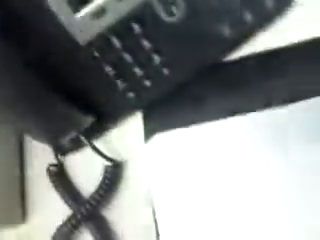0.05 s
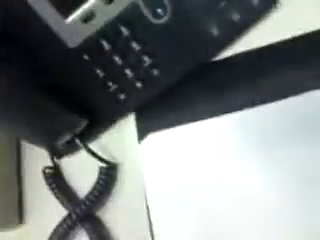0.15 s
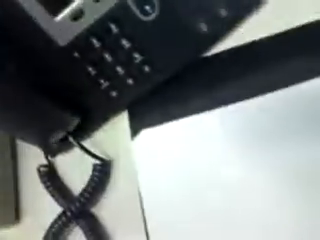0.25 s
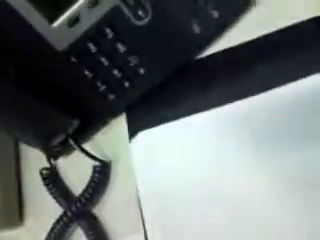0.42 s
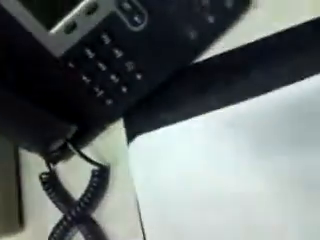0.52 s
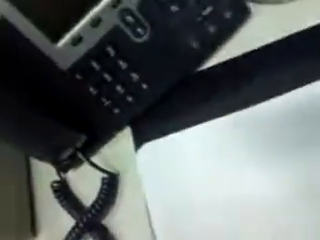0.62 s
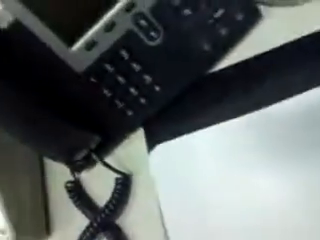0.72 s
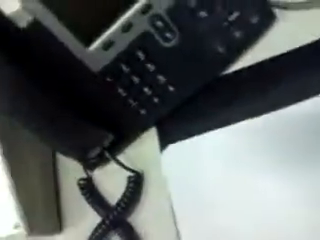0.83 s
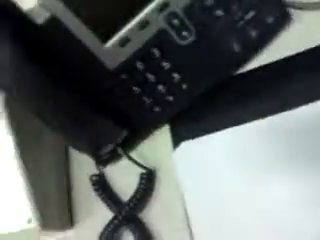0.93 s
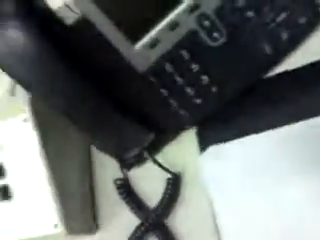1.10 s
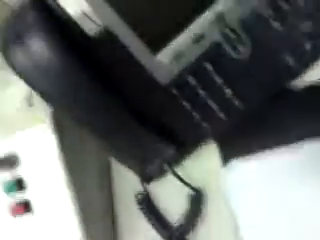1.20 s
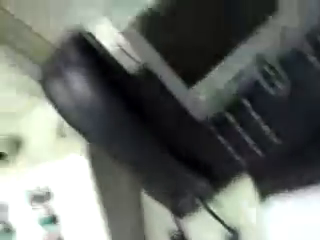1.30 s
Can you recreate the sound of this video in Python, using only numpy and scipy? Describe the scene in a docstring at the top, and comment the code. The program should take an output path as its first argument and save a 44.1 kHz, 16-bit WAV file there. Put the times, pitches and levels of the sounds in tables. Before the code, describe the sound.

A small plastic button clicks sharply at about 0.2 seconds as it is pressed, then snaps back louder at about 0.4 seconds with a tiny settling rattle. Both clicks are bright, close and to the left, with a short small-room tail. A hand brushes faintly on plastic at the start and near 0.65 seconds. A quiet fan hum and hiss continue until the end, around 1.4 seconds.

```python
"""A small plastic button, pressed and released beside the left microphone of a hand-held camera.
Each snap is a light tick, a noise crack, a ring of the plastic case and a soft low thump.
After the release the button rebounds and settles with two small knocks.
The right microphone hears it late and shaded by the case; the small room adds a short tail.
Background: faint friction of the hand on the case, and a fan (hum, air noise, rumble)."""
import sys
import numpy as np
from scipy import signal
from scipy.fft import rfft, irfft
from scipy.io import wavfile

SR = 44100
rng = np.random.default_rng(int(sys.argv[2]) if len(sys.argv) > 2 else 0)


def generate_wav(signal):
    """Clip the signal to [-1, 1] and save it as 16-bit WAV at the path in sys.argv[1]."""
    frames = np.transpose(np.atleast_2d(signal))
    scaled = np.clip(frames, -1, 1) * 32767
    pcm = np.round(scaled).astype(np.int16)
    wavfile.write(sys.argv[1], SR, pcm)


N = 59535

# press, release: (time [s], rise [s], crack level [dB], crack T60 [s], ring level [dB],
# body level [dB], body T60 [s], thump level [dB])
SNAP_EVENTS = [(0.213, 0.00062, -17, 0.017, -27, -28.5, 0.053, -47),
               (0.3859, 0.00066, -10, 0.0075, -21, -25, 0.045, -44)]
# play taken up before each snap: (time [s], level [dB])
TICK_EVENTS = [(0.1947, -35), (0.368, -34)]
# button on its seat: (time [s], level [dB], T60 [s], ring level [dB])
KNOCK_EVENTS = [(0.3936, -50, 0.0098, -28.5), (0.4006, -23.5, 0.0072, -21.5)]
# case modes: (frequency [Hz], T60 [s], press gain [dB], release gain [dB], knock gain [dB])
CASE_MODES = [(1120, 0.011, -15, -15, -17), (1320, 0.034, -4, -35, -19), (1627, 0.027, -15, -16.5, -19),
              (1892, 0.017, -9, -9.5, -16.5), (2212, 0.037, -38, -21, -15), (2832, 0.018, -1.5, -9, -7.5),
              (3114, 0.024, -8, -11.5, -24), (3905, 0.035, -5, -28, -14), (4275, 0.028, -6.5, -6.5, -17),
              (4700, 0.013, 3, -26, -20), (6110, 0.019, 2, -5.5, -36), (6480, 0.02, -3, -29, -44),
              (8270, 0.015, -5, -8.5, -36), (10250, 0.038, -4.5, -36, -49), (11010, 0.015, 4, -5, -40),
              (11500, 0.017, 5, -4, -42), (11950, 0.0096, -10, 10, -26), (12240, 0.0081, -8, 14.5, -11),
              (13100, 0.027, -10, -1, -35), (13700, 0.021, 8.5, -8, -35)]
# noise burst spectra: (frequency [Hz], relative level [dB])
TICK_SPECTRUM = [(200, -40), (1200, -15), (2500, -5), (4500, -2.5), (6300, 3), (8000, -5), (11500, 2),
                 (14000, 4)]
CRACK_SPECTRUM = [(200, -36), (780, -16.5), (1100, -2.5), (2300, -13), (4000, -1), (7300, -7), (8700, -3),
                  (10000, 5.5), (12300, 2.5), (14000, -2.5)]
BODY_SPECTRUM = [(100, 0), (280, 15), (780, -31), (1050, 5), (1600, -6), (2400, 0), (4300, 3), (7500, 1),
                 (10500, 4), (14000, -6.5)]
KNOCK_SPECTRUM = [(250, 17.5), (500, -5), (850, -12), (1300, -15), (1850, 3), (2400, -21), (4200, 11.5),
                  (6500, 9), (8500, -6), (13000, 0)]
# path responses: (frequency [Hz], gain [dB])
RADIATION_EQ = [(300, -4.5), (750, -4.5), (1100, -5), (1700, 0)]  # small case, little bass
SHADE_EQ = [(200, -7.5), (1000, 6.5), (1450, 6), (2000, -3.5), (2800, -20.5), (4100, -12), (5200, -7.5),
            (6600, -14.5), (8600, -10.5), (11000, -22), (12200, -17), (14000, -32)]  # round the case to the far microphone
ROOM_EQ = [(200, -5), (1000, 6), (2000, 13.5), (3500, 2.5), (5000, 0), (7000, 2), (10000, -5), (12200, -1),
           (14000, -4)]
# hand on the case: (midpoint [s], sigma [s], level [dB], centre [Hz], half width [oct])
BRUSH_EVENTS = [(0.013, 0.022, -53, 517, 0.51), (0.021, .014, -59.5, 1690, 0.32),
                (0.09, 0.03, -68, 4900, 0.087), (0.64, 0.0042, -61, 8800, 0.45),
                (0.65, 0.015, -58.5, 2800, 0.79)]
# fan tones: (frequency [Hz], level [dB], waver depth [0-1])
HUM_TONES = [(119.25, -57, 0), (204.4, -56.5, 0.2), (313, -71.5, 0.46), (362.2, -72, 0.28),
             (401, -70, 0.31), (595.6, -72.5, 0.33), (1129, -76, 1), (1205, -75, 1)]
# fan noise spectra: (frequency [Hz], relative level [dB])
AIR_SPECTRUM = [(150, -12.5), (250, -8), (333, -8.5), (400, -11), (428, -7.5), (651, -7.5), (757, -12),
                (796, -10), (1150, -10.5), (1530, -15.5), (5480, -22.5), (10200, -24.5), (13800, -26)]
RUMBLE_SPECTRUM = [(10, -8), (28, 2.5), (45, 5), (70, 5.5), (100, 6), (170, -3), (240, -3), (330, -11),
                   (600, -84)]
# fan noise balance: (frequency [Hz], left minus right [dB])
AIR_PAN = [(60, -33.5), (180, 17), (540, 2.5), (1610, 0.5), (4800, 2), (14400, 2.5)]
RUMBLE_PAN = [(30, 0.5), (70, -9.5), (130, 7), (300, -2)]
# stereo likeness of the air noise: (frequency [Hz], correlation [0-1])
AIR_CORRELATION = [(200, 0.29), (500, 0.74), (1200, 0.43), (2500, 0.033), (6000, 0.056), (14000, 0.045)]
# level drift of air and rumble: (time [s], gain [dB])
FAN_DRIFT = [(0, 4), (.15, 3), (.5, 2), (.9, 1), (1.35, 2)]

CRACK_RISE_S, BODY_RISE_S, TICK_T60_S = 0.00031, 0.0053, 0.025
THUMP_HZ, THUMP_DELAY_S, THUMP_RISE_S, THUMP_T60_S = 280, 0.0043, 0.0025, 0.035
FAR_DELAY_S, FAR_COPY_DELAY_S, FAR_COPY_DB = 0.000421, 0.001532, 0.5
ROOM_DB, ROOM_T60_S, ROOM_RIGHT_DB = -16, 0.2, -2.5
WAVER_HZ, HUM_RIGHT_DB = 8.1, 2.5
AIR_BASE_DB, RUMBLE_BASE_DB, RUMBLE_CORRELATION = -56.5, -57, 0.83
CUTOFF_HZ = 14050


def button():
    """Press and release: light tick, then a crack and dense ringing of the body."""
    out = np.zeros(N)
    for start_s, db in TICK_EVENTS:
        out += burst(start_s, db, CRACK_RISE_S, TICK_T60_S, TICK_SPECTRUM)
    for start_s, rise_s, crack_db, crack_t60_s, _, body_db, body_t60_s, _ in SNAP_EVENTS:
        out += burst(start_s, crack_db, rise_s, crack_t60_s, CRACK_SPECTRUM)
        out += burst(start_s, body_db, BODY_RISE_S, body_t60_s, BODY_SPECTRUM)
    return out


def knocks():
    """The button rebounds against its seat: short dry ticks."""
    return sum(burst(start_s, db, CRACK_RISE_S, t60_s, KNOCK_SPECTRUM)
               for start_s, db, t60_s, _ in KNOCK_EVENTS)


def case_modes(start_s, rise_s, strike):
    """Damped sines of alternating sign; strike: 0 press, 1 release, 2 knock."""
    t = np.arange(N) / SR - start_s
    return sum((-1) ** m * amp(gains_db[strike]) * envelope(start_s, rise_s, t60_s)
               * np.sin(2 * np.pi * hz * t)
               for m, (hz, t60_s, *gains_db) in enumerate(CASE_MODES))


def case_ring():
    """Each snap and knock excites the case modes."""
    out = np.zeros(N)
    for strike, (start_s, rise_s, _, _, ring_db, *_) in enumerate(SNAP_EVENTS):
        out += amp(ring_db) * case_modes(start_s, rise_s, strike)
    for start_s, _, _, ring_db in KNOCK_EVENTS:
        out += amp(ring_db) * case_modes(start_s, CRACK_RISE_S, strike=2)
    return out


def thumps():
    """Each snap jolts the camera body: a low damped sine, alike in both channels."""
    t = np.arange(N) / SR
    return sum(amp(db) * envelope(start_s + THUMP_DELAY_S, THUMP_RISE_S, THUMP_T60_S)
               * np.sin(2 * np.pi * THUMP_HZ * (t - start_s))
               for start_s, *_, db in SNAP_EVENTS)


def microphones(near):
    """Left: direct. Right: late and shaded; a second copy about 1 ms later colours the click."""
    n = np.arange(400)
    path = np.sinc(n - FAR_DELAY_S * SR) + amp(FAR_COPY_DB) * np.sinc(n - FAR_COPY_DELAY_S * SR)
    far = signal.fftconvolve(equalise(near, SHADE_EQ), path / np.linalg.norm(path))[:N]
    return np.array([near, far])


def room(x):
    """Short diffuse tail: convolution with decaying noise."""
    tails = rng.standard_normal((2, N)) * envelope(start_s=0.0017, rise_s=0.0017, t60_s=ROOM_T60_S)
    tails /= np.linalg.norm(tails, axis=1, keepdims=True)
    wet = signal.fftconvolve(equalise(x, ROOM_EQ)[None], tails, axes=1)[:, :N]
    return amp(ROOM_DB) * amp([[0], [ROOM_RIGHT_DB]]) * wet


def hand_brushes():
    """Friction on the case: Gaussian swells of band noise."""
    t, out = np.arange(N) / SR, np.zeros((2, N))
    for mid_s, sigma_s, db, centre_hz, half_width_oct in BRUSH_EVENTS:
        band_db = rolloff_db(np.log2((bins_hz() + 1) / centre_hz) / half_width_oct)
        swell = np.exp(-0.5 * ((t - mid_s) / sigma_s) ** 2)
        out += amp(db) * swell * stereo_noise(band_db, correlation=0.55)
    return out


def fan_hum():
    """Fan tones, most wavering in level and phase."""
    t, out = np.arange(N) / SR, np.zeros(N)
    slow_db = rolloff_db(bins_hz() / WAVER_HZ)
    for hz, db, depth in HUM_TONES:
        waver = 1 + depth * (noise(slow_db) + 1j * noise(slow_db))
        carrier = np.exp(2j * np.pi * (hz * t + rng.random()))
        out += amp(db) * unit_rms((waver * carrier).real)
    return out * amp([[0], [HUM_RIGHT_DB]])


def fan_noise():
    """Moving air and low rumble, drifting together in level."""
    t, hz = np.arange(N) / SR, bins_hz()
    air_db = lookup(AIR_SPECTRUM, hz) + np.outer([0.5, -0.5], lookup(AIR_PAN, hz))
    air = amp(AIR_BASE_DB) * stereo_noise(air_db, lookup(AIR_CORRELATION, hz))
    rumble_db = lookup(RUMBLE_SPECTRUM, hz) + np.outer([1, 0], lookup(RUMBLE_PAN, hz))
    rumble = amp(RUMBLE_BASE_DB) * stereo_noise(rumble_db, RUMBLE_CORRELATION)
    drift_db = np.interp(t, *np.transpose(FAN_DRIFT))
    return (air + rumble) * amp(drift_db)


def amp(db):
    """dB to gain."""
    return 10 ** (np.asarray(db) / 20)


def unit_rms(x):
    """Scale to rms 1."""
    return x / np.sqrt(np.mean(x ** 2) + 1e-20)


def lookup(table, hz):
    """Interpolate on a log-frequency axis."""
    table_hz, values = np.transpose(table)
    return np.interp(np.log(hz + 1), np.log(table_hz + 1), values)


def bins_hz():
    """Full-length FFT bin frequencies."""
    return np.fft.rfftfreq(N, 1 / SR)


def rolloff_db(ratio):
    """Flat near 0, -3 dB at ratio 1."""
    return -10 * np.log10(1 + ratio ** 4)


def noise(shape_db):
    """Shaped noise, rms 1."""
    return unit_rms(irfft(rfft(rng.standard_normal(N)) * amp(shape_db), N))


def stereo_noise(shape_db, correlation):
    """Partly correlated pair of shaped noises, joint rms 1."""
    left, independent = rfft(rng.standard_normal((2, N)))
    right = correlation * left + np.sqrt(1 - correlation ** 2) * independent
    return unit_rms(irfft(np.array([left, right]) * amp(shape_db), N))


def envelope(start_s, rise_s, t60_s):
    """Linear rise, exponential decay."""
    t = np.maximum(np.arange(N) / SR - start_s, 0)
    return np.minimum(t / rise_s, 1) * np.exp(-np.log(1000) * t / t60_s)


def burst(start_s, db, rise_s, t60_s, spectrum):
    """One impact of shaped noise."""
    return amp(db) * envelope(start_s, rise_s, t60_s) * noise(lookup(spectrum, bins_hz()))


def equalise(x, eq):
    """Minimum-phase filter."""
    hz = abs(np.fft.fftfreq(2048, 1 / SR))
    log_gain = np.log(amp(lookup(eq, hz)))
    taps = np.fft.ifft(np.exp(np.conj(signal.hilbert(log_gain)))).real
    return signal.fftconvolve(x, taps[:len(taps) // 2])[:N]


def scene():
    """Button, room, hand and fan; only the button's noise bursts feed the room."""
    bursts = button() + knocks()
    radiated = equalise(bursts + case_ring(), RADIATION_EQ)
    return microphones(radiated) + thumps() + room(bursts) + hand_brushes() + fan_hum() + fan_noise()


def record(dry):
    """Band limit: linear-phase low-pass."""
    taps = signal.firwin(401, CUTOFF_HZ, window=("kaiser", 8), fs=SR)
    return signal.oaconvolve(dry, taps[None], "same")


dry = scene()
out = record(dry)
generate_wav(out)
```